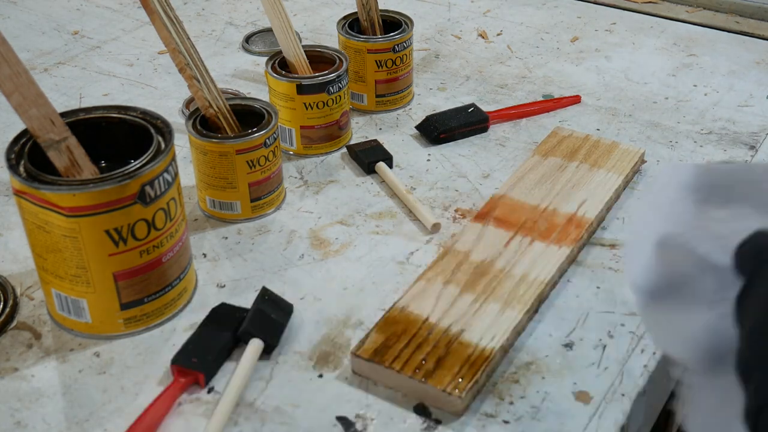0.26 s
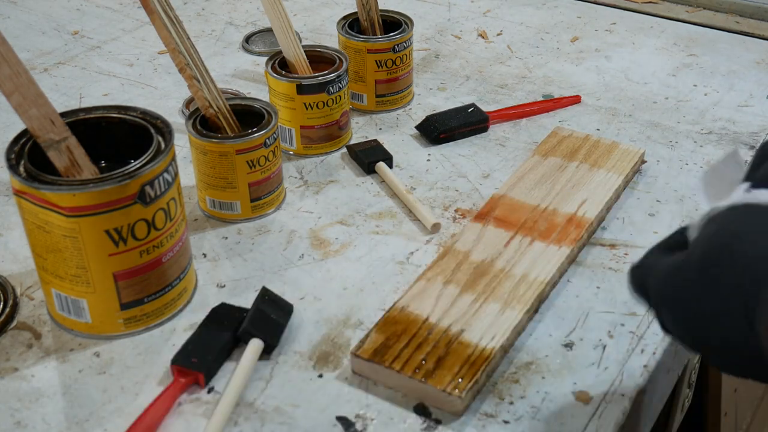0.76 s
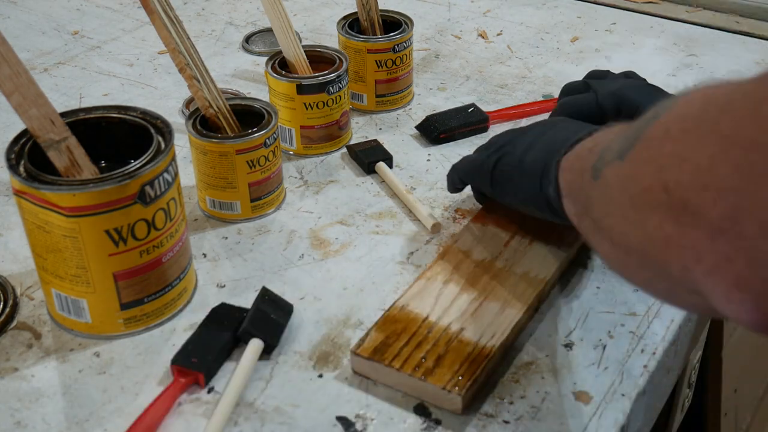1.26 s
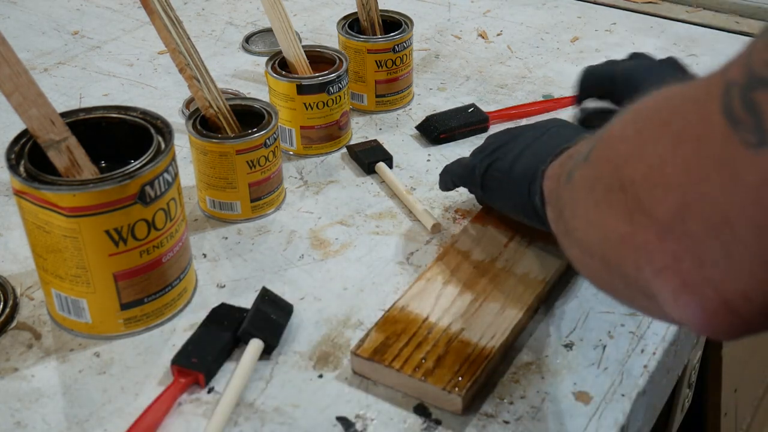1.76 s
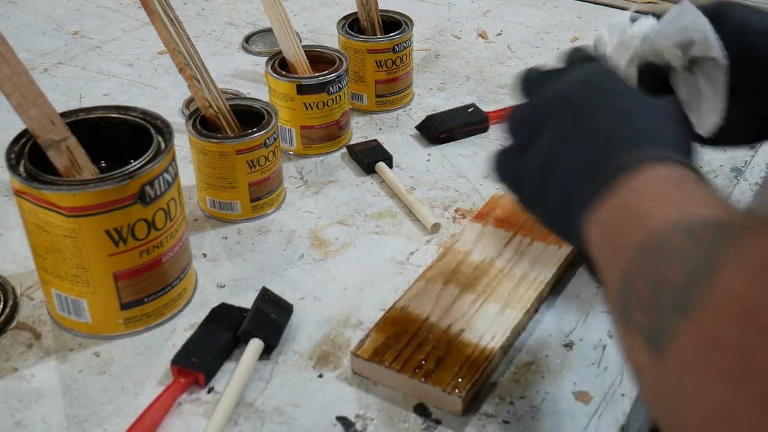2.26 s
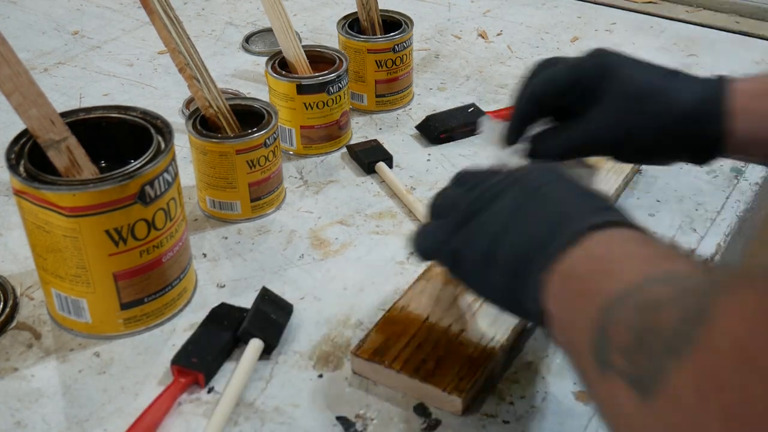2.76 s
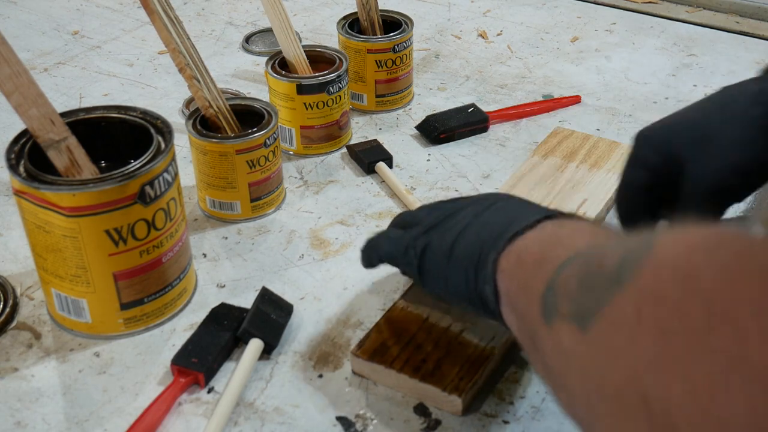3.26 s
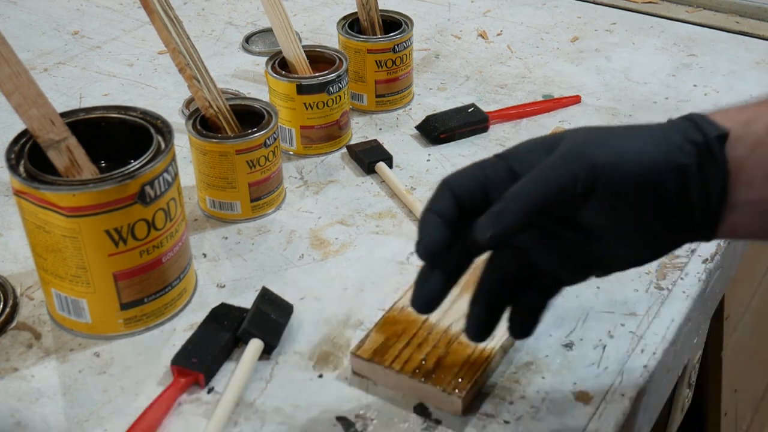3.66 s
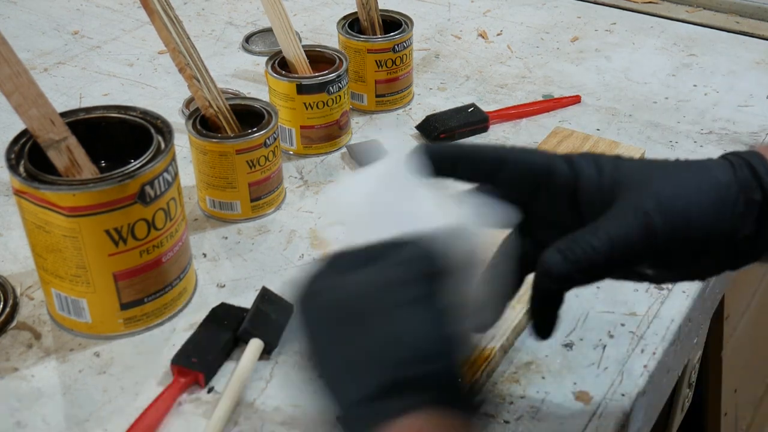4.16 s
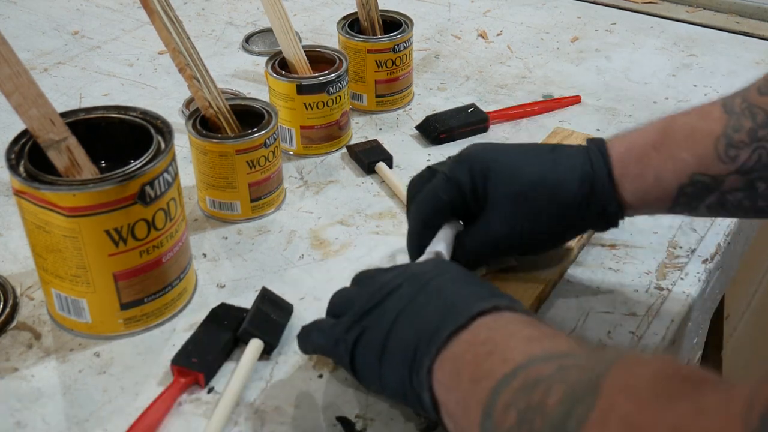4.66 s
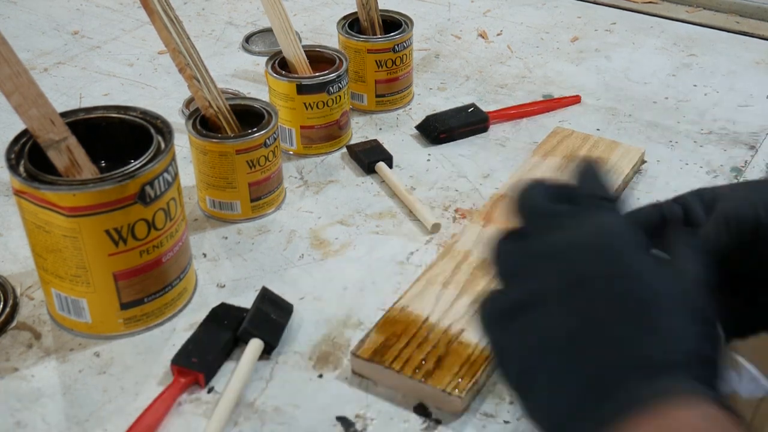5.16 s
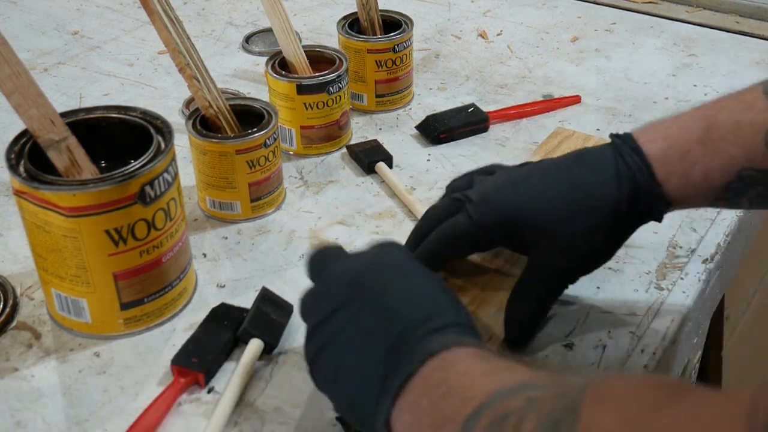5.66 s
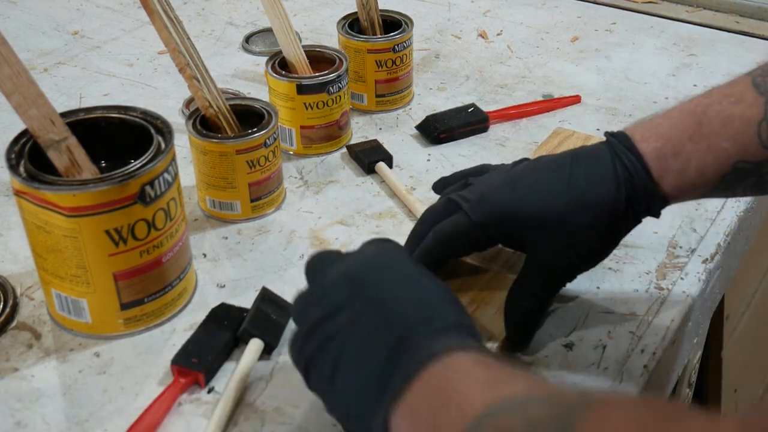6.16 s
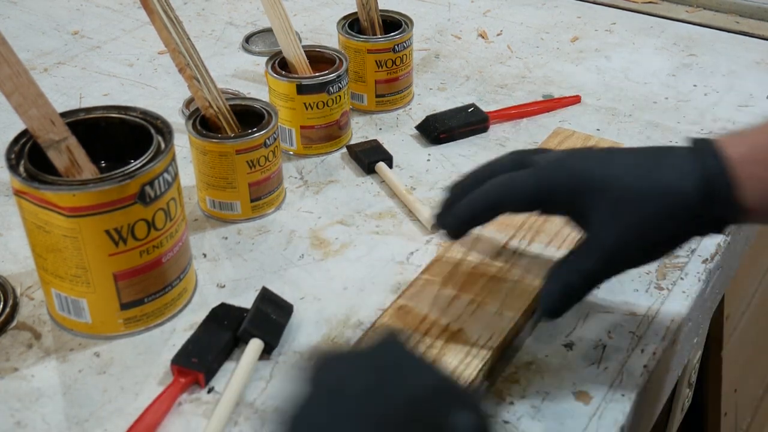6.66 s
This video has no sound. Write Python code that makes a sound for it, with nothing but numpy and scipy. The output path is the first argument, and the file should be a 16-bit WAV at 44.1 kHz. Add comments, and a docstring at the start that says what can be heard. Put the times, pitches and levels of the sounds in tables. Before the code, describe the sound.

A crumpled towel rubs a small wooden board in uneven strokes, scratchy and hissing, with hollow hums and a few light knocks on the bench.

```python
"""A crumpled towel is rubbed over a small wooden board on a workshop bench, close to a camera.
Fibres slip over the grain: shaped noise makes the board hum, the weave scratch and the fibres hiss.
The board knocks on the bench in ringing modes; snags and snapping fibres are short damped bursts.
The bench drones as low noise and thumps in low decaying tones; a small room answers over steady hiss."""
import sys
import numpy as np
from scipy import signal
from scipy.fft import rfft, irfft, next_fast_len
from scipy.io import wavfile
from scipy.ndimage import uniform_filter1d, map_coordinates

SR = 44100
rng = np.random.default_rng(int(sys.argv[2]) if len(sys.argv) > 2 else 0)


def transcribe(u):
    """Save the signal u as a 16-bit wav file named by the first command-line argument.

    u: samples, shape (n,) or (channels, n), limited to [-1, 1]; the rate is SR.
    q: integer samples, one column per channel.
    """
    v = np.clip(np.atleast_2d(u).T, -1, 1)
    q = np.round(v * 32767).astype(np.int16)
    wavfile.write(sys.argv[1], SR, q)


N = 304642

# the board knocks on the bench: t/s, level/dB before trim, hardness/dB (gain of the upper modes)
KNOCKS = [(1.359, -11, 5), (1.893, -13.5, -5), (2.099, -5, 5.5), (3.001, -20, 0), (4.995, -12.5, -5),
          (5.699, -27, 1), (6.502, -26.5, 3)]


def towel():
    """Four ranges of one friction: board hum, weave scratch, fibre hiss and the finest sheen."""
    # board under the towel, colour of the hum: f/Hz, level/dB
    hum_colour = [(250, -74), (400, -5), (600, -3.5), (1300, -1), (1700, -24), (2500, -24)]
    # weave over the grain, colour of the scratch: f/Hz, level/dB
    weave_colour = [(1000, -14), (1600, 0.5), (2300, -8.5), (3600, -3), (4200, -3), (4700, -36),
                    (5400, -70)]
    # slipping fibres, colour of their hiss: f/Hz, level/dB
    fibre_colour = [(4300, -3.5), (5000, -5), (5800, 0.5), (6800, 6), (7600, -4), (9000, -11), (10500, -37)]
    # finest sheen, the top of the friction: f/Hz, level/dB
    sheen_colour = [(8000, -3), (9500, -4), (11500, -10), (14500, -17), (16000, -20)]
    board_db, weave_db, fibre_db, sheen_db, _, board_hz, focus_db, weave_hz = pushes()
    press = amp(1.36 * wobble(35))  # the hand's pressure trembles in all ranges at once
    # moving resonances: centre/Hz, height/dB, width/octaves
    board_peak = (board_hz, focus_db, 0.3)
    weave_peak = (weave_hz, np.full(N, 8.5), 0.38)
    hum = rub(board_db, hum_colour, grain_db=1.5, lump_db=2, patchy_db=2.8, peak=board_peak)
    weave = rub(weave_db, weave_colour, grain_db=1.5, lump_db=0.8, patchy_db=2.8, peak=weave_peak)
    fibres = rub(fibre_db, fibre_colour, grain_db=1, lump_db=0.5, patchy_db=2.2)
    sheen = rub(sheen_db, sheen_colour, grain_db=1, lump_db=0.5, patchy_db=2.4)
    return press * (hum + weave + fibres + sheen)


def pushes():
    """The pushes swell, hold, fade and add in power: five levels in dB, then the loudest pushes' grip."""
    # every push of the towel, long wipes are several pushes run together:
    # start of hold t/s, rise/s, hold/s, fall/s, board level/dB, scratch level/dB, fibre level/dB,
    # sheen level/dB, bench level/dB, board f/Hz, board focus/dB, scratch f/Hz
    push_rows = [(0.0, .1, 0.23, 0.12, -52, -74, -79, -91, -59.5, 510, 5, 1970),
                 (0.12, .1, 0.28, .1, -57, -57, -80, -85, -77, 970, 0, 4160),
                 (0.371, 0.077, .1, 0.26, -32, -34.5, -60, -70, -43.5, 850, 1, 1970),
                 (0.528, 0.15, 0.0073, 0.18, -27, -26, -31.5, -37.5, -38.5, 1130, -2, 2700),
                 (0.604, 0.12, .01, 0.32, -26, -25, -33, -42.5, -42.5, 1030, -3.5, 2400),
                 (0.769, 0.24, .03, 0.38, -26, -27.5, -36, -45.5, -46, 910, -1, 1920),
                 (0.894, 0.1, 0.008, 0.19, -23, -22.5, -29, -36.5, -41.5, 840, 0, 2660),
                 (.955, 0.14, .01, 0.084, -28, -32, -37.5, -43, -41.5, 790, 0, 3100),
                 (1.089, 0.11, .005, 0.061, -38, -32.5, -34.5, -50, -59, 1000, 1, 2000),
                 (1.193, 0.32, 0.011, 0.2, -37.5, -40.5, -38.5, -59, -74, 940, 2, 2400),
                 (1.325, 0.1, 0.011, 0.14, -28, -34, -37.5, -64, -50, 920, 10.5, 2580),
                 (1.554, 0.044, .005, 0.19, -36, -49.5, -49, -72, -62, 1050, 17, 2640),
                 (1.712, 0.13, 0.011, 0.22, -26, -31.5, -31.5, -41, -50, 1070, 12.5, 2460),
                 (1.836, 0.16, 0.046, 0.16, -34.5, -36, -36, -43.5, -54, 975, 10, 2960),
                 (1.896, 0.078, 0.007, 0.11, -22, -29, -28.5, -34, -32.5, 966, 10, 2700),
                 (2.108, 0.11, .01, 0.29, -32, -47, -43, -80, -41.5, 960, 9.5, 2950),
                 (2.204, 0.33, 0.066, 0.083, -56, -46, -47, -75, -75, 885, 10.5, 3250),
                 (2.45, 0.12, 0.069, 0.062, -29, -29, -35, -49, -46, 850, 4, 2070),
                 (2.66, 0.13, 0.018, 0.091, -31.5, -28, -27, -37.5, -52.5, 650, 6.5, 2450),
                 (2.802, 0.063, .005, 0.095, -53, -37.5, -32, -68, -90, 800, 11, 2800),
                 (2.976, 0.083, .03, 0.2, -36.5, -54, -44.5, -75, -52, 955, 21, 2960),
                 (3.041, 0.051, 0.081, 0.073, -31, -30.5, -28.5, -44, -47.5, 980, 17, 1550),
                 (3.14, 0.13, 0.044, 0.17, -35.5, -32, -31, -36.5, -54, 980, 12, 2970),
                 (3.221, 0.14, 0.039, 0.13, -31, -32.5, -39, -34, -46, 420, 20.5, 3380),
                 (3.279, 0.073, 0.006, 0.07, -27.5, -20, -37, -36, -38, 516, 8, 3650),
                 (3.586, 0.094, 0.012, 0.059, -35, -33, -43, -53, -40.5, 1050, -5, 2070),
                 (3.758, 0.092, .005, 0.17, -54.5, -51.5, -62, -75, -73, 850, 2.5, 3580),
                 (3.914, .06, .005, 0.14, -41, -56, -62, -70, -49, 573, 10.5, 3220),
                 (4.023, 0.13, 0.011, 0.13, -35.5, -48, -59, -70, -48.5, 910, -6, 1790),
                 (4.275, 0.03, 0.048, 0.068, -24.5, -39, -62, -75, -45, 565, 15.5, 1660),
                 (4.338, 0.081, 0.1, .09, -28, -27.5, -30, -42.5, -46, 1080, 0, 3220),
                 (4.58, 0.1, 0.0043, 0.18, -29.5, -31, -35, -56, -52, 664, 11, 1960),
                 (4.719, 0.17, 0.0074, 0.076, -24.5, -33.5, -32.5, -61, -45, 804, 7, 2230),
                 (4.837, 0.11, 0.065, 0.079, -24, -27, -26, -35, -38, 754, 7.5, 3600),
                 (4.928, 0.2, .11, 0.09, -28, -25, -34, -33.5, -39, 950, 1.5, 3460),
                 (5.093, 0.11, 0.017, 0.13, -39, -46, -47.5, -59, -67, 1160, 18, 3100),
                 (5.169, .15, .01, 0.13, -45.5, -38.5, -51, -58, -72, 1250, 8, 3300),
                 (5.331, .04, 0.022, 0.11, -35.5, -27.5, -37, -43, -47, 1010, -2, 2760),
                 (5.4, 0.13, 0.0097, .1, -26, -26.5, -30.5, -36, -44, 940, 3.5, 2750),
                 (5.612, 0.15, 0.085, 0.31, -42.5, -54, -57, -70, -48.5, 760, 14, 2450),
                 (5.724, 0.22, 0.056, 0.092, -31.5, -53, -49, -68, -44, 680, 10, 2300),
                 (5.802, 0.072, .005, 0.19, -18, -31.5, -36, -62, -53, 855, 14, 3500),
                 (5.849, 0.12, 0.047, 0.29, -30.5, -20.5, -22, -36.5, -64, 915, 7, 3400),
                 (5.926, 0.22, 0.14, 0.11, -27, -27.5, -34, -32, -49, 787, 16.5, 3200),
                 (6.226, 0.065, 0.033, .2, -36.5, -44.5, -61, -64, -65, 820, 13, 2880),
                 (6.311, .12, 0.015, .1, -35, -49, -64, -68, -66, 820, 8, 3000),
                 (6.372, 0.062, 0.12, 0.13, -26.5, -28, -31.5, -35.5, -54, 828, 20.5, 3100),
                 (6.504, 0.055, .005, 0.097, -28, -22.5, -33, -32.5, -50, 800, 1, 3000)]
    # how strongly board, scratch, fibres, sheen and bench follow the swell: factor [1]
    steepness = [1.234, 1.363, 1.52, 1.54, 1.17]
    # how far each range stands higher in mid-hold, where the hand is fastest: level/dB
    arch_levels = [0.65, 0.56, 1.52, 2.1, .5]
    swell_db = 30  # gained over a rise and lost over a fall, before the steepness factor
    bend = 1.136  # over 1: rise and fall get steeper away from the top
    s, rise, hold, fall, *cols = np.transpose(push_rows)[:, :, None]
    t = np.arange(0, N, 64) / SR
    before = np.maximum(s - t, 0) / rise
    after = np.maximum(t - s - hold, 0) / fall
    away = (before + after) ** bend
    edge = np.minimum(np.abs(2 * (t - s) / hold - 1), 1) ** 2  # 0 in mid-hold, 1 outside the hold
    power = []
    for db, steep, arch_db in zip(cols, steepness, arch_levels):
        level_db = db - steep * swell_db * away - arch_db * edge
        power.append(amp(2 * level_db) + 1e-14)
    # board pitch and focus follow the board power, scratch pitch the scratch power
    grip = []
    for p, col in zip([power[0], power[0], power[1]], cols[5:]):
        grip.append(np.sum(p ** 2 * col, axis=0) / np.sum(p ** 2, axis=0))
    levels_db = 10 * np.log10(np.sum(power, axis=1))
    return curves(np.transpose([t, *levels_db, *grip]))


def rub(level_db, spectrum, grain_db, lump_db, patchy_db, peak=None):
    """Uneven slips of many fibres, coloured by a body and by a resonance that moves with the hand."""
    slips = rng.standard_normal(N) * amp(grain_db * wobble(900) + lump_db * wobble(60))
    hz, t, z = signal.stft(slips, SR, nperseg=1024, noverlap=768)
    # folds of cloth: narrow ridges that last a while
    field = uniform_filter1d(rng.standard_normal(z.shape), size=4, axis=0)
    field = uniform_filter1d(field, size=18, axis=1)
    db = along(spectrum, hz)[:, None] + patchy_db * field / field.std()
    if peak:
        centre_hz, peak_db, octaves = peak
        now = np.minimum((t * SR).astype(int), N - 1)
        distance = np.log2((hz[:, None] + 1) / centre_hz[now]) / octaves
        db = db + peak_db[now] * np.exp(-distance ** 2)
    gain = amp(db) / np.sqrt(np.mean(amp(db) ** 2, axis=0))  # the colour moves, the power stays
    x = signal.istft(z * gain, SR, nperseg=1024, noverlap=768)[1][:N]
    return amp(level_db) * x / x.std()


def snags():
    """The towel snags on edges and lets go: rough bursts of four damped tones round one pitch."""
    # snags: t/s, level/dB before trim, f/Hz, t60/s
    snag_rows = [(0.316, -21, 1030, 0.021), (0.404, -17.5, 450, 0.057), (0.612, -1, 1317, 0.022),
                 (1.207, -16, 714, 0.052), (1.304, -9.5, 653, 0.035), (1.315, -1, 883, 0.022),
                 (3.566, -7.5, 713, 0.017), (4.265, -14.5, 504, 0.041), (4.282, -15, 504, 0.055),
                 (4.334, -11, 1206, 0.034), (5.332, -20, 644, 0.039), (6.496, -24, 890, 0.023),
                 (6.502, -4, 781, 0.044)]
    out, t = np.zeros(N + SR), np.arange(SR // 4) / SR
    for s, db, hz, t60 in snag_rows:
        spread = np.exp(0.215 * rng.standard_normal(4))
        burst = sum(ring(hz * k, t60, t, attack=0.0027) for k in spread)
        add_at(out, s, amp(db - 5.0) * burst)
    return out[:N]


def ticks():
    """Fibres snap: very short bursts of five damped tones close round one pitch."""
    # snapping fibres: t/s, level/dB before trim, f/Hz
    tick_rows = [(0.8822, -7.5, 3600), (1.881, -17.5, 5930), (2.173, -21.5, 3350), (2.662, -20, 3800),
                 (3.025, -17, 6000), (3.2744, -27, 3470), (3.5702, -23, 2270), (3.762, -36, 3900),
                 (4.3364, -17, 2150), (4.4607, -21, 1870), (5.0438, -13, 3600), (5.325, -23, 3470),
                 (6.0477, -13, 3010), (6.507, -13, 2320), (6.5146, -6, 3150)]
    out, t = np.zeros(N + SR), np.arange(SR // 4) / SR
    for s, db, hz in tick_rows:
        spread = np.exp(0.06 * rng.standard_normal(5))
        burst = sum(ring(hz * k, 0.014, t, attack=0.0001) for k in spread)
        add_at(out, s, amp(db - 11.0) * burst)
    return out[:N]


def knocks():
    """The board rocks onto the bench and rings in its modes; a harder knock brightens the upper ones."""
    # modes of the board: f/Hz, level/dB before scatter and hardness, t60/s
    board_modes = [(143, -13, .12), (277, 0, .085), (325, -12, .06), (460, -15, .05), (640, -4, .02),
                   (860, -2, .018), (1060, 0, .015), (1400, -8, .012)]
    out, t = np.zeros(N + SR), np.arange(SR // 4) / SR
    for s, db, hard_db in KNOCKS:
        knock = np.zeros(len(t))
        for hz, level_db, t60 in board_modes:
            mode_db = level_db + rng.normal(0, 2) + hard_db * (hz > 550)
            knock += amp(mode_db) * ring(hz, t60, t, attack=0.0015)
        add_at(out, s, amp(db - 4.0) * knock)
    return out[:N]


def bench():
    """The bench top drones under pressure and after knocks, the legs thump slowly when it shifts."""
    # the bench shifts on its legs: t/s, level/dB before trim
    thump_rows = [(1.39, -46), (1.89, -51), (2.10, -44), (3.29, -44), (4.74, -37), (5.03, -41), (5.7, -51),
                  (6.5, -39)]
    # bench top, colour of the drone: f/Hz, level/dB
    top_colour = [(60, -50), (130, -10), (180, -12.5), (280, -1.5), (360, 5), (520, -32)]
    thumps, t = np.zeros(N + SR), np.arange(SR // 3) / SR
    for s, db in thump_rows:
        low = ring(51, 0.22, t, attack=0.016)
        upper = ring(rng.normal(81, 6), 0.25, t, attack=0.014)
        add_at(thumps, s, amp(db + 0.5) * (low + 0.44 * upper))
    shake = np.pad(amp(pushes()[4]), (0, SR))
    for s, db, _ in KNOCKS:
        decay = amp(db - 18 - 250 * t)  # 18 dB under the knock's table level, falling 250 dB a second
        add_at(shake, s, decay * (1 - np.exp(-t / 0.0017)))
    drone = rub(0, top_colour, grain_db=0.8, lump_db=0.5, patchy_db=2.5)
    return shake[:N] * drone + thumps[:N]


def ring(hz, t60, t, attack):
    """A damped vibration with a soft start: t60 and attack in seconds."""
    return amp(-60 * t / t60) * (1 - np.exp(-t / attack)) ** 2 * np.sin(2 * np.pi * hz * t)


def echo(x, t60, delay):
    """The small room's diffuse answer: a delayed, decaying noise tail of energy 1."""
    t = np.arange(SR // 3) / SR
    tail = rng.standard_normal(len(t)) * amp(-60 * t / t60) * (t > delay)
    return signal.fftconvolve(x, tail / np.linalg.norm(tail))[:N]


def phase_scrambled(x):
    """The same sound with its phases drawn at random."""
    z = signal.stft(x, nperseg=512)[2]
    return signal.istft(z * np.exp(2j * np.pi * rng.random(z.shape)), nperseg=512)[1][:N]


def microphone_hiss():
    """Coloured noise of the microphone, which creeps up at first."""
    # colour of the hiss, relative density: f/Hz, level/dB
    hiss_colour = [(15, -47), (25, -23), (200, -8.5), (791, -8), (929, -10), (1040, -8), (1820, -13),
                   (14600, -19), (15800, -21)]
    # course of the hiss: t/s, level/dB
    hiss_levels = [(0, -62), (.6, -54.5), (1.5, -53), (6.9, -54.5)]
    hiss = filtered(rng.standard_normal(N), lambda hz: amp(along(hiss_colour, hz)))
    return amp(curves(hiss_levels)[0]) * hiss / hiss.std()


def amp(db):
    """Decibels to amplitude."""
    return 10 ** (np.asarray(db) / 20)


def along(points, hz):
    """Interpolates (Hz, value) points on a log axis, -120 outside them."""
    f, v = np.transpose(points)
    return np.interp(np.log(hz + 1), np.log(f + 1), v, left=-120, right=-120)


def curves(rows):
    """One value per sample for each column after the time."""
    s, *cols = np.transpose(rows)
    return [np.interp(np.arange(N) / SR, s, c) for c in cols]


def wobble(rate):
    """A smooth random curve, rate knots a second."""
    knots = rng.standard_normal(int(N * rate / SR) + 4)
    return map_coordinates(knots, [np.arange(N) * rate / SR])


def filtered(x, response):
    """Shapes the spectrum of x by a response of frequency."""
    m = next_fast_len(N + SR // 2)
    return irfft(rfft(x, m) * response(np.fft.rfftfreq(m, 1 / SR)), m)[..., :N]


def add_at(track, s, burst):
    """Adds a burst to the track in place, from s seconds on."""
    track[round(s * SR):][:len(burst)] += burst


def scene():
    """All in front of the camera; the channels differ by a faint phase-scrambled copy of the sound."""
    # gain of the phase-scrambled copy in the side channel: f/Hz, level/dB
    side_gain = [(1, -24), (400, -26), (6000, -16), (SR, -13)]
    near = towel() + snags() + ticks() + knocks() + bench()
    room = amp(-16) * echo(near, t60=0.053, delay=0.0053)
    mid = near + room + microphone_hiss()
    side = filtered(phase_scrambled(mid), lambda hz: amp(along(side_gain, hz)))
    return np.array([mid + side, mid - side])


def record(dry):
    """The camera keeps nothing above its band limit."""
    top_hz = 15780
    return filtered(dry, lambda hz: hz < top_hz)


dry = scene()
out = record(dry)
transcribe(out)
```